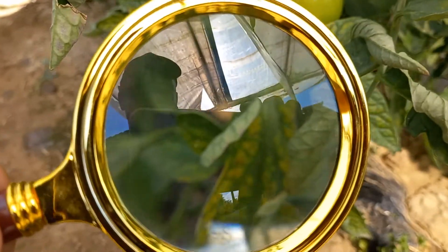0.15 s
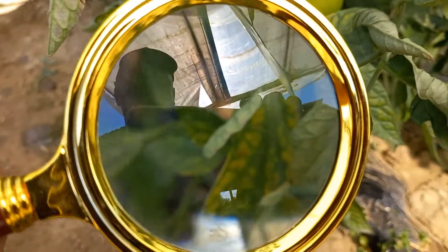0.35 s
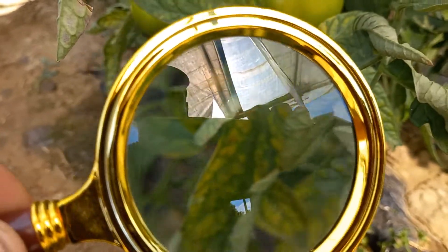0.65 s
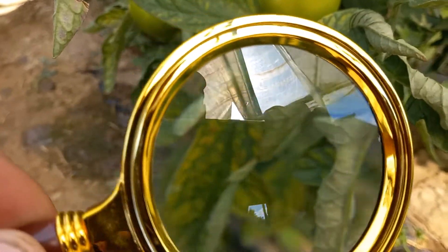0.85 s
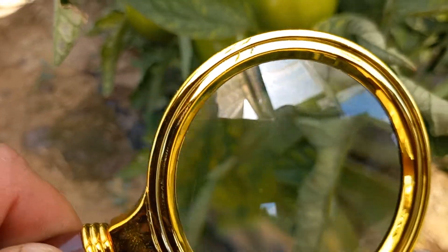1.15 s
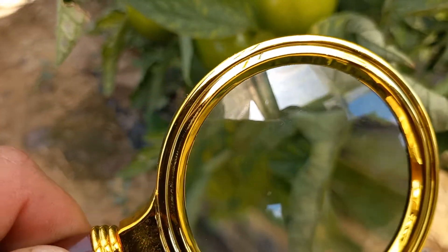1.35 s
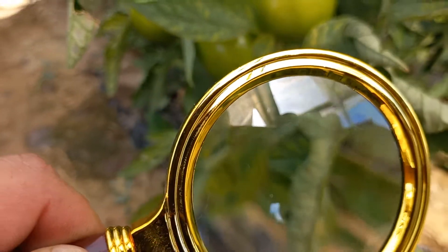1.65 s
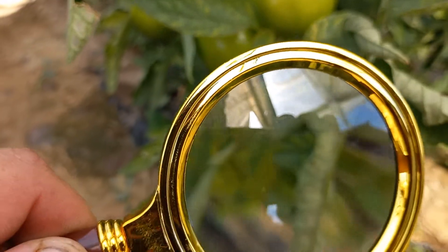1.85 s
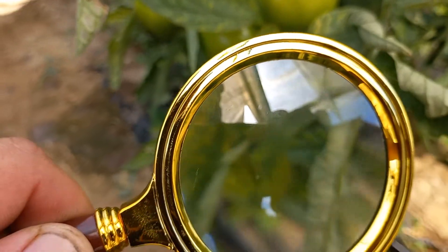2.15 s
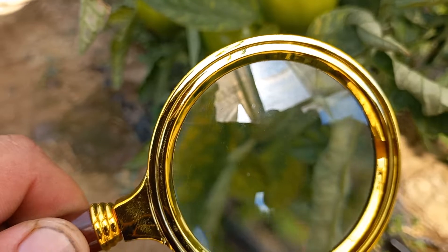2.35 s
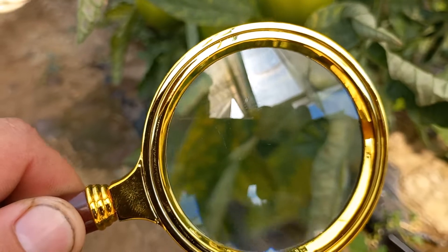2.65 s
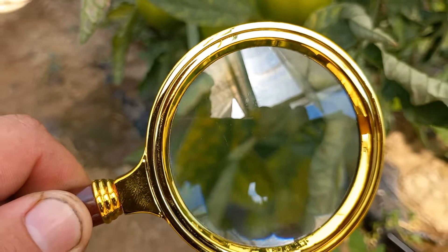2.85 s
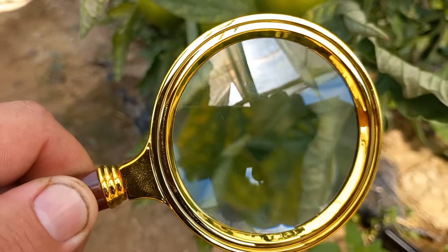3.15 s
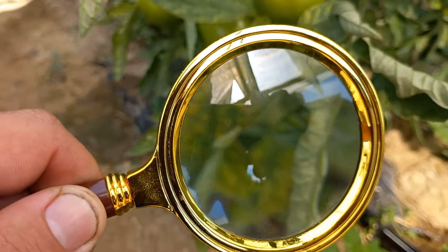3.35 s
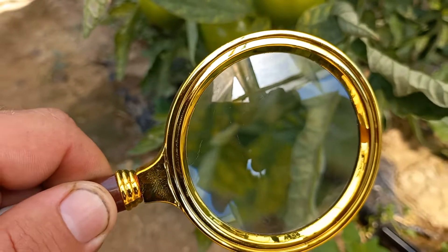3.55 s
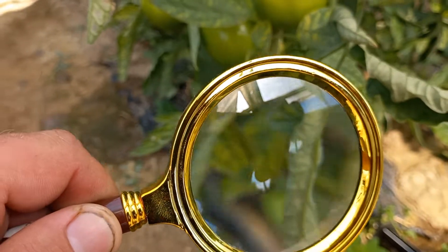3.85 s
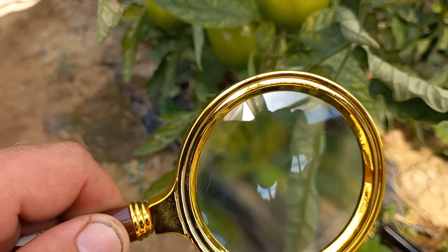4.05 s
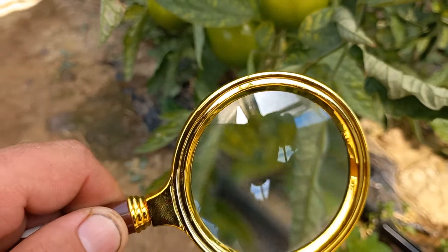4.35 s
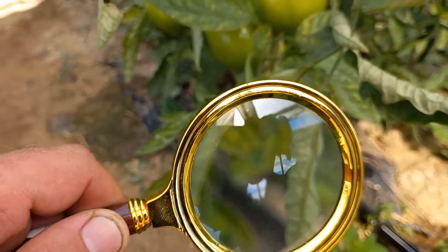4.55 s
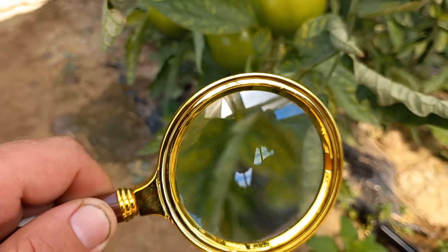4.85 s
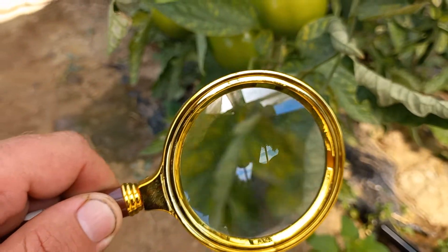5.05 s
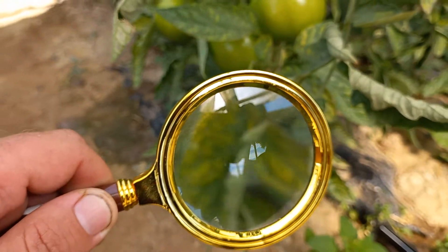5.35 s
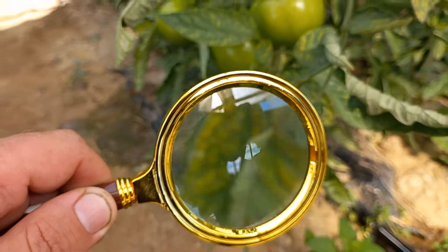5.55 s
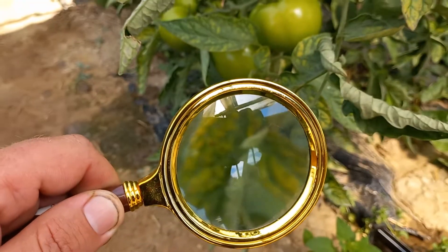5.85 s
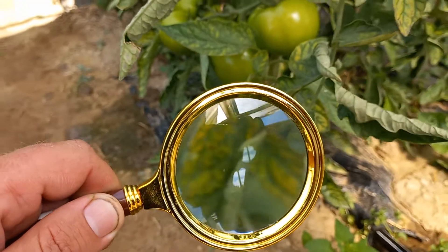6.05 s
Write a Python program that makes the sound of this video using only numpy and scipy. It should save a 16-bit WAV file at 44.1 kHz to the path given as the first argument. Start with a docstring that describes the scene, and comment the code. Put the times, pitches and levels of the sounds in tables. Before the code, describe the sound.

A distant engine drones and wavers across a field, slowing gradually, while a bird repeats short falling chirps with faint echoes over low rumble.

```python
"""A far engine drones across a field from the start, its tones fading in and out in the moving air,
over rumble, roar, hiss, rustle and thin whines; a low hum beside it soon dies away.
Short high ticks sound, some just before chirps; a bird repeats a falling three-note chirp with echoes.
Small dull taps follow; something far off clatters twice, at about 3 and 4.4 s, while the drone slows,
mostly after the first clatter. The left microphone hears everything later and mostly duller."""
import sys
import numpy as np
from scipy import signal
from scipy.fft import rfft, irfft, next_fast_len
from scipy.io import wavfile
from scipy.ndimage import uniform_filter1d

SR = 44100
rng = np.random.default_rng(int(sys.argv[2]) if len(sys.argv) > 2 else 0)


def int16_out(signal):
    """Quantize to a 16-bit WAV file."""
    q = np.round(np.clip(np.atleast_2d(signal).T, -1, 1) * 32767)
    wavfile.write(sys.argv[1], SR, q.astype(np.int16))


N = 273420  # samples


def amp(db):
    """Amplitude factor of a level in dB."""
    return 10 ** (np.asarray(db) / 20)


def evened(x):
    """Scale to rms 1."""
    return x / np.sqrt(np.mean(x ** 2) + 1e-20)


def read(points, hz):
    """Read a table of (frequency, value) on a logarithmic frequency axis."""
    f, value = np.transpose(points)
    return np.interp(np.log(hz + 1), np.log(f + 1), value)


def curves(rows):
    """Turn each column after the time into a curve over the whole scene."""
    s, *columns = np.transpose(rows)
    return [np.interp(np.arange(N) / SR, s, c, right=c[-1]) for c in columns]


def add(mix, start_s, sound):
    """Mix a sound in from start_s, cut at the end of the mix."""
    part = mix[..., round(start_s * SR):][..., :sound.shape[-1]]
    part += sound[..., :part.shape[-1]]


def fuzzy(hz, width_hz, clean, apart=0.1):
    """Two channels of a tone of rms about 1: part clean, part scattered by turbulence into a narrow band."""
    step = 16  # samples between points of the slow scatter
    r = np.exp(-np.pi * width_hz * step / SR)
    a, b = rng.standard_normal((2, 2, N // step + 2))
    once = signal.lfilter([1 - r], [1, -r], a + 1j * b)
    scatter = signal.lfilter([1 - r], [1, -r], once)
    scatter /= np.sqrt(np.mean(abs(scatter) ** 2))
    shared, own = [np.interp(np.arange(N) / step, np.arange(len(v)), v) for v in scatter]
    clean = np.clip(clean, 0, 1)
    swing = np.sqrt(clean) + np.sqrt(1 - clean) * shared
    swing = swing + apart * own * np.array([[1], [-1]])  # opposite at the two microphones
    cycles = np.cumsum(hz * np.ones(N)) / SR + rng.random()
    return np.sqrt(2) * (swing * np.exp(2j * np.pi * cycles)).real


# how alike noise is at the two microphones: (pitch_hz, likeness)
LIKENESS = [(30, 0.9), (60, 0.92), (300, 1), (500, .7), (860, 0.092), (1300, 0.27), (1900, 0.65),
            (3000, 0.14), (5000, 0.022), (12000, .02)]


def noise(spectrum, patchy_db, alike=True, size=1024):
    """Two channels of noise, rms 1 together, from random short-time spectra with drifting patches."""
    frames, hz = 4 * N // size + 5, np.fft.rfftfreq(size, 1 / SR)
    top = np.searchsorted(hz, spectrum[-1][0])  # silent above the last point
    a, b, c, d, patches = rng.standard_normal((frames, top, 5)).T
    patches = uniform_filter1d(patches, size=8, axis=0)
    patches = evened(uniform_filter1d(patches, size=14, axis=1))
    same = alike * np.clip(read(LIKENESS, hz[:top]), -1, 1)[:, None]
    right = a + 1j * b
    left = same * right + np.sqrt(1 - same ** 2) * (c + 1j * d)
    z = np.zeros((2, len(hz), frames), complex)
    z[:, :top] = np.array([left, right])
    z[:, :top] *= amp(read(spectrum, hz[:top])[:, None] + patchy_db * patches)
    return evened(signal.istft(z, nperseg=size, noverlap=3 * size // 4)[1][:, :N])


# firing rate of the far engine: (time_s, rate_hz)
FIRING_RATE = [(0, 138.4), (.3, 143.5), (.42, 128.7), (.8, 129.6), (1.1, 126.2), (1.6, 126.7), (2.4, 125.5),
               (3.2, 124), (3.8, 117.7), (4.2, 115.8), (4.6, 111.9), (5.2, 107.4), (5.6, 101.5),
               (6.2, 100.5)]
# how its exhaust tones arrive: (time_s, first_order_db, second_order_db, higher_orders_db)
DRONE_LEVELS = [(0.0, -38.5, -47, -66.5), (0.33, -46, -43.5, -59), (0.58, -35.5, -37, -49.5),
                (0.67, -38, -43, -54), (0.77, -31, -33.5, -52), (0.91, -43, -40.5, -56),
                (1.31, -35.5, -36, -53), (1.68, -48.5, -46, -56), (2.32, -52, -53.5, -64.5),
                (2.61, -45, -37.5, -49.5), (2.82, -35, -38.5, -53), (2.94, -46.5, -50, -52.5),
                (3.06, -33, -32.5, -50), (3.11, -44, -31, -46.5), (3.23, -33.5, -44.5, -50),
                (3.4, -48.5, -42.5, -61.5), (3.45, -40, -48.5, -58.5), (3.81, -28, -28.5, -50),
                (3.85, -27, -36, -58), (4.19, -32.5, -46, -54.5), (4.33, -35, -42, -59),
                (4.45, -36.5, -56, -60.5), (4.62, -38.5, -40.5, -54.5), (4.84, -40, -44.5, -64),
                (4.98, -35, -42.5, -54), (5.05, -39, -49, -63.5), (5.14, -36.5, -41, -59),
                (5.4, -45, -55.5, -60.5), (6.12, -45, -47.5, -62), (6.17, -41, -40.5, -60.5)]
# balance of the higher orders: (order, level_db)
HIGHER_ORDERS = [(3, -0.5), (4, -9), (5, -9.5)]
# a second, sharper path of the drone: (time_s, second_order_hz, level_db)
DETOUR_PATH = [(0, 290, -44.5), (.35, 292, -48), (.5, 268, -62.5), (.9, 268, -63), (1.1, 275, -43),
               (1.4, 270, -44.5), (1.7, 262, -58.5), (2.4, 262, -57), (2.7, 262, -46), (3.1, 258, -50.5),
               (3.4, 256, -65.5), (6.2, 250, -78)]
# balance of the tones on that path: (order, level_db)
DETOUR_BALANCE = [(1, 0), (2, -0.5), (3, -24), (4, -13.5)]
# the first order steadies as the drone swells: its clean share rises
CALM_FROM_S, CALM_RISE_S, CLEAN_GUSTY, CLEAN_CALM = 3.1, 0.22, 0.69, .93


def engine():
    """Orders of the firing rate, scattered by moving air; uneven cylinders add a throb at a sixth of it."""
    hz = uniform_filter1d(curves(FIRING_RATE)[0], size=3000)
    first_db, second_db, upper_db = curves(DRONE_LEVELS)
    calm_s = [CALM_FROM_S, CALM_FROM_S + CALM_RISE_S]
    clean = np.interp(np.arange(N) / SR, calm_s, [CLEAN_GUSTY, CLEAN_CALM])
    throb = 1 + 0.13 * fuzzy(hz / 6, 8.6, 0.047, apart=0)
    tones = amp(first_db) * fuzzy(hz, 8.4, clean)
    tones += amp(second_db) * fuzzy(2 * hz, 32.0, 0.62)
    upper = sum(amp(db) * fuzzy(k * hz, 60., 0.13, apart=0.16) for k, db in HIGHER_ORDERS)
    tones += amp(upper_db) * upper
    detour_hz, detour_db = curves(DETOUR_PATH)
    detour = sum(amp(db) * fuzzy(k * detour_hz / 2, 4. * k, 1.7 / k) for k, db in DETOUR_BALANCE)
    tones += amp(detour_db) * detour
    return tones * throb


HUM_HZ, HUM_DB, HUM_END_S, HUM_FADE_DB_PER_S = 206.3, -49, 0.8, 39


def hum():
    """A low tone, slightly scattered, that holds until HUM_END_S and then fades away."""
    fade_db = HUM_FADE_DB_PER_S * np.clip(np.arange(N) / SR - HUM_END_S, 0, None)
    return amp(HUM_DB - fade_db) * fuzzy(HUM_HZ, 3.5, 0.58)


# levels of the field's noise bands: (time_s, deep_db, rumble_db, roar_db, hiss_db, rustle_db)
BAND_LEVELS = [(0, -54.5, -43.5, -60, -73.5, -79), (.7, -50.5, -52.5, -60, -74.5, -77.5),
               (1.4, -49.5, -45.5, -57.5, -74, -78), (2.15, -54, -46, -63.5, -77.5, -81),
               (2.65, -49, -45, -57.5, -77.5, -76), (3.2, -50, -41, -60, -75.5, -72),
               (3.48, -50.5, -43, -57.5, -74.5, -71), (3.6, -47, -36.5, -56, -72, -63),
               (3.85, -45, -34, -55, -75.5, -66.5), (4.05, -44.5, -39, -55.5, -73.5, -69),
               (4.6, -44.5, -45.5, -59, -74.5, -76.5), (5.2, -51.5, -44, -60, -74.5, -83),
               (5.7, -56, -46.5, -61.5, -75.5, -78.5), (6.2, -34, -51.5, -56.5, -76, -83)]
# relative spectra of those bands, each: (pitch_hz, level_db_per_hz)
DEEP_SPECTRUM = [(20, -33), (40, -20), (60, -12), (85, -3), (105, -4), (140, -34)]
RUMBLE_SPECTRUM = [(60, -48), (90, -4), (130, 5.5), (170, 3), (230, 1.5), (280, -9.5), (400, -14.5),
                   (630, -24), (800, -47), (1100, -71.5)]
ROAR_SPECTRUM = [(410, -14.5), (700, 1), (779, -3), (978, -0.5), (1060, -1), (1890, 0.5), (2200, -4),
                 (2430, -14), (2810, -20), (4300, -33.5), (5590, -53.5), (9460, -120)]
HISS_SPECTRUM = [(3530, -37), (6000, -11.5), (7670, 1.5), (8830, -1.5), (9690, 1), (10200, -4),
                 (10500, -10.5), (11500, -8), (15000, -37), (22000, -120)]
RUSTLE_SPECTRUM = [(1800, -29.5), (2500, 4.5), (3500, 0.5), (4500, -3), (6500, -6), (9000, -17.5),
                   (12000, -27.5)]
# thin whines: (pitch_hz, width_hz, level_db)
WHINE_TONES = [(1631, 16, -79), (2168, 10, -78), (7115, 5, -89), (7714, 30, -91), (9985, 50, -89)]


def backdrop():
    """Rumble, roar, hiss and rustling leaves as moving noise bands, with thin whines as narrow tones."""
    deep_db, rumble_db, roar_db, hiss_db, rustle_db = curves(BAND_LEVELS)
    out = amp(rumble_db) * noise(RUMBLE_SPECTRUM, 1., size=4096)
    out += amp(deep_db) * noise(DEEP_SPECTRUM, 0.93, size=4096)
    out += amp(roar_db) * noise(ROAR_SPECTRUM, 1.1)
    out += amp(hiss_db) * noise(HISS_SPECTRUM, .8)
    out += amp(rustle_db) * noise(RUSTLE_SPECTRUM, 2.6)
    return out + sum(amp(db) * fuzzy(hz, width_hz, 0.58, apart=0.8) for hz, width_hz, db in WHINE_TONES)


def burst(hz, width_hz, t60, rise):
    """A short puff of noise around hz: a fast rise, then a decay of 60 dB in t60, cut at 0.18 s."""
    t, f = np.arange(0, min(t60, .18), 1 / SR), np.fft.rfftfreq(8192, 1 / SR)
    band = np.exp(-((f - hz) / width_hz) ** 2 / 2)
    puff = evened(irfft(rfft(rng.standard_normal(8192)) * band))
    return puff[:len(t)] * amp(-60 * t / t60) * np.minimum(t / rise, 1)


# short soft puffs of high noise, some just before a chirp:
# (start_s, level_db, centre_hz, width_hz, t60_s)
HIGH_TICKS = [(0.121, -62, 8700, 1300, 0.088), (.339, -70, 7600, 1200, 0.089),
              (0.503, -66, 7660, 1300, 0.098), (0.923, -66, 8000, 1790, .1), (.989, -63, 9100, 1800, 0.15),
              (1.79, -70, 5600, 1312, 0.2), (2.622, -67.5, 5776, 600, 0.17),
              (3.539, -59.5, 8017, 2000, 0.15), (4.269, -60, 9860, 2000, 0.19),
              (5.397, -68, 5060, 797, 0.18), (5.766, -64, 9400, 1200, 0.1)]


def high_ticks():
    """Short puffs of high noise, 6 dB weaker on the left."""
    out = np.zeros((2, N))
    for start, db, hz, width_hz, t60 in HIGH_TICKS:
        tick = amp(db) * burst(hz, width_hz, t60, rise=0.0037)
        add(out, start, tick * amp([[-6.], [0]]))
    return out


def echoes(hold, t60):
    """Dense scatter from plant rows: even for a while, then dying; another pattern for each channel."""
    t = np.arange(SR // 2) / SR
    shape = np.minimum(t / 0.0095, 1) * amp(-60 * t / t60) / (1 + (t / hold) ** 3.9)
    taps = rng.standard_normal((2, len(t))) * shape
    return taps / np.linalg.norm(taps[0])


# one chirp, before the pitch factor and wobble: (after_start_s, pitch_hz, level_db)
CHIRP_SHAPE = [(0, 3606, -12.5), (.006, 3920, -13.5), (0.019, 3890, -2.5), (.032, 3486, -7),
               (0.039, 3925, 0.5), (.044, 3894, -16.5), (.048, 2985, -23), (.053, 3030, -10),
               (0.062, 3273, 3), (0.071, 3020, -9), (.077, 2947, -17), (0.084, 3045, -6.5),
               (0.097, 2667, -4), (.114, 2370, -24)]
# the bird's chirps; note levels are for the direct sound, left_db is the left's level over the right's:
# (start_s, level_db, pitch_factor, second_note_db, third_note_db, echo_db, left_db)
CHIRP_CALLS = [(0.333, -56.5, 0.98, -29, -13, 4.5, -2), (1.807, -51, 0.99, 0, -11, -3.5, -2),
               (2.641, -54, 0.96, 0.5, -1, 3, -2.5), (3.615, -52.5, 0.96, -1.5, 6.5, 1, 0),
               (4.567, -57, 0.99, 8.5, 10, 2.5, 1), (5.413, -46, 0.98, -9, -10, -4, 3)]


def bird():
    """A whistled pattern, hoarse on its last note; a turning head alters direct notes more than echoes."""
    out, (s, hz, db) = np.zeros((2, N)), np.transpose(CHIRP_SHAPE)
    t = np.arange(0, s[-1], 1 / SR)
    second_on, third = t > s[5], t > s[10]  # the notes begin at these points of the shape
    for start, level_db, pitch, second_db, third_db, echo_db, left_db in CHIRP_CALLS:
        wobble = evened(uniform_filter1d(rng.standard_normal(len(t)), size=100))
        pitch_hz = pitch * uniform_filter1d(np.interp(t, s, hz), size=120)
        pitch_hz *= 1 + (0.014 + 0.03 * third) * wobble
        song = amp(level_db + np.interp(t, s, db)) * np.sin(2 * np.pi * np.cumsum(pitch_hz) / SR)
        # moving leaves blur the echoes
        flutter = 1 + 0.36 * evened(uniform_filter1d(rng.standard_normal(len(t)), size=60))
        note_db = np.where(third, third_db, second_db * second_on)
        scattered = song * amp(0.26 * note_db) * flutter
        heard = signal.fftconvolve(scattered[None], echoes(hold=0.093, t60=0.6), axes=1)
        heard = amp(echo_db) * heard
        add(heard, 0, song * amp(note_db) * amp([[-6.], [0]]))  # direct sound, weaker on the left
        add(out, start, heard * amp([[left_db], [0]]))
    return out


# small dull taps: (start_s, level_db, pitch_hz, t60_s)
DULL_TAPS = [(.674, -44.5, 1717, 0.044), (1.415, -54, 1880, 0.031), (2.998, -41.5, 1290, 0.084),
             (3.066, -45, 1712, 0.065), (3.103, -45.5, 1562, 0.035), (4.458, -45, 1140, 0.12),
             (4.533, -45, 1235, .07), (5.045, -46, 1770, .04)]


def dull_taps():
    """Small dull taps: decaying sines with a soft onset, equal in both channels."""
    out = np.zeros((2, N))
    for start, db, hz, t60 in DULL_TAPS:
        t = np.arange(0, t60, 1 / SR)
        tap = amp(db - 60 * t / t60) * np.minimum(t / 0.0018, 1) * np.sin(2 * np.pi * hz * t)
        add(out, start, tap[None])
    return out


# far clatters; length is the time to about half amplitude: (start_s, level_db, length_s)
FAR_CLATTERS = [(2.989, -50.5, 0.24), (4.437, -52.5, 0.2)]
# their relative spectrum: (pitch_hz, level_db_per_hz)
CLATTER_SPECTRUM = [(300, -12.5), (450, 5), (650, -3.5), (800, -0.5), (1300, -0.5), (1900, -5), (2400, -13),
                    (3200, -41)]


def far_clatters():
    """Grainy clatters far off, smeared by the distance into noise of uneven level."""
    out = np.zeros((2, N))
    grains = amp(1.7 * evened(uniform_filter1d(rng.standard_normal(N), size=300)))
    din = noise(CLATTER_SPECTRUM, 1.8) * grains
    for start, db, length in FAR_CLATTERS:
        t = np.arange(0, 3 * length, 1 / SR)
        shape = np.minimum(t / 0.018, 1) / (1 + (t / length) ** 3.4)
        add(out, start, amp(db) * shape * din[:, round(start * SR):][:, :len(t)])
    return out


def scene():
    """Everything heard across the field, summed before it reaches the microphones."""
    return engine() + hum() + backdrop() + high_ticks() + bird() + dull_taps() + far_clatters()


# shading of the left microphone: (pitch_hz, left_minus_right_db)
LEFT_SHADOW = [(60, -0.5), (300, 0.5), (800, -1.5), (1100, -9), (1400, -7.5), (2000, -16), (3000, -3.5),
               (4500, -8), (7000, -22.5), (11000, -14.5)]
# lateness of the left microphone: (pitch_hz, delay_samples)
LEFT_LAG = [(60, 8), (130, 15), (300, 16), (500, 13), (1100, 22), (16000, 22)]
# relative spectrum of the microphones' own hiss: (pitch_hz, level_db_per_hz)
SELF_SPECTRUM = [(300, -9.5), (3000, -5), (6000, -4.5), (9000, -6.5), (13000, 2), (16000, -1)]
SELF_DB, EDGE_HZ = -80.5, 15780  # hiss level; upper band limit


def record(dry):
    """The camera body delays and shades the left microphone; both hiss, lose deep bass and stop at EDGE_HZ."""
    size = next_fast_len(N + 2048)
    hz = np.fft.rfftfreq(size, 1 / SR)
    delay = np.exp(-2j * np.pi * hz * read(LEFT_LAG, hz) / SR)
    left = irfft(rfft(dry[0], size) * amp(read(LEFT_SHADOW, hz)) * delay, size)[:N]
    heard = np.array([left, dry[1]]) + amp(SELF_DB) * noise(SELF_SPECTRUM, .3, alike=False)
    heard = signal.sosfilt(signal.butter(3, 48., "high", fs=SR, output="sos"), heard)
    band_limit = signal.firwin(1023, EDGE_HZ, window=("kaiser", 9), fs=SR)
    return signal.oaconvolve(heard, band_limit[None], "same")


dry = scene()
out = record(dry)
int16_out(out)
```